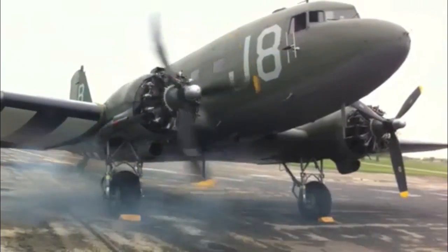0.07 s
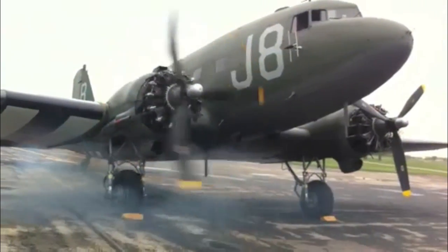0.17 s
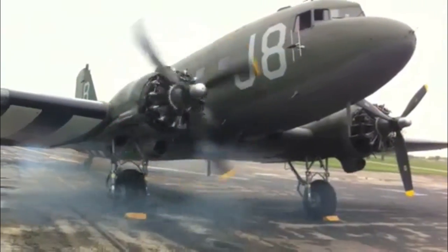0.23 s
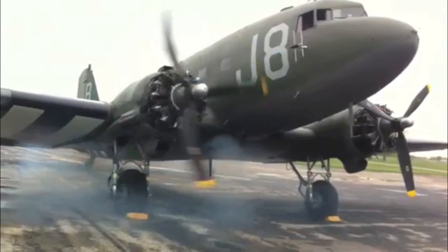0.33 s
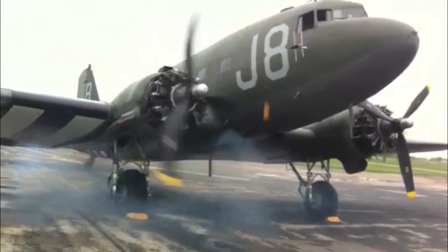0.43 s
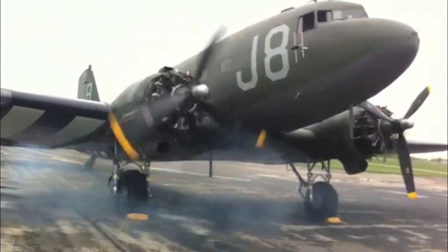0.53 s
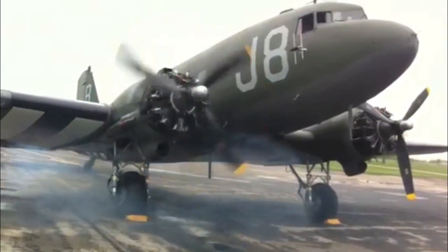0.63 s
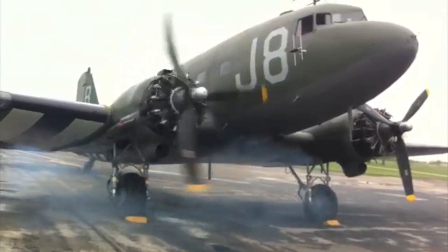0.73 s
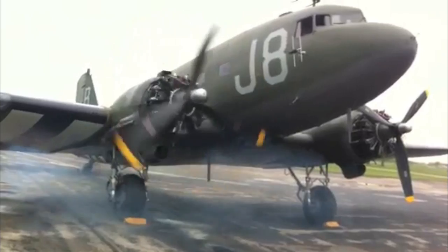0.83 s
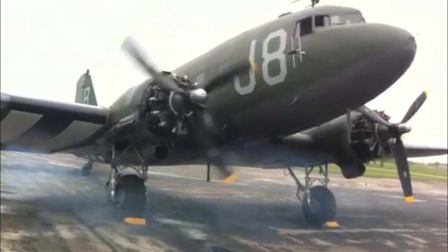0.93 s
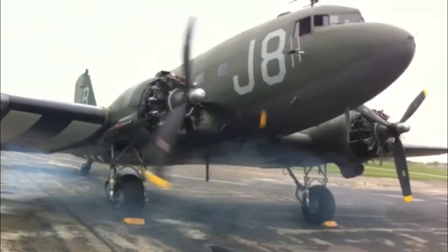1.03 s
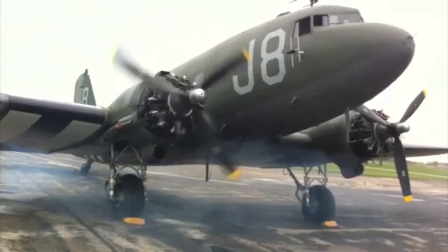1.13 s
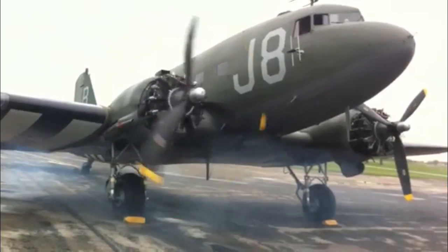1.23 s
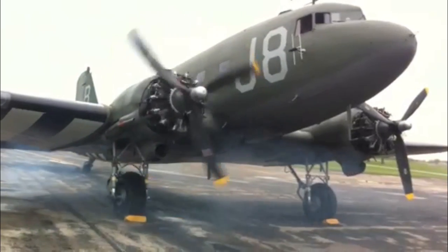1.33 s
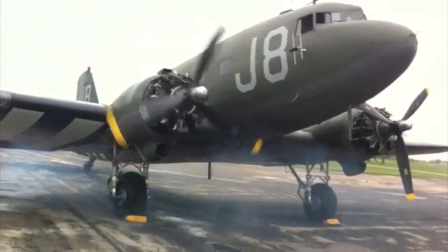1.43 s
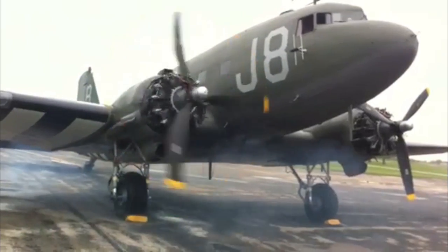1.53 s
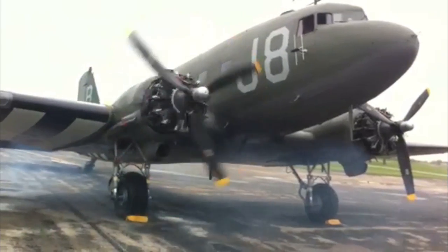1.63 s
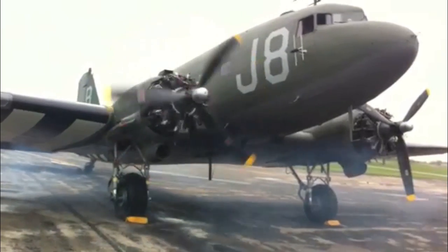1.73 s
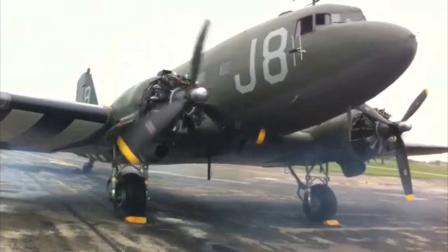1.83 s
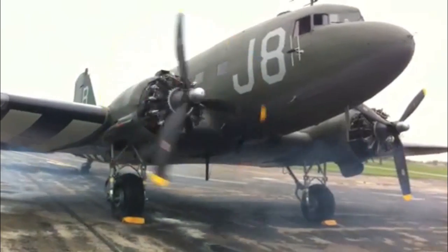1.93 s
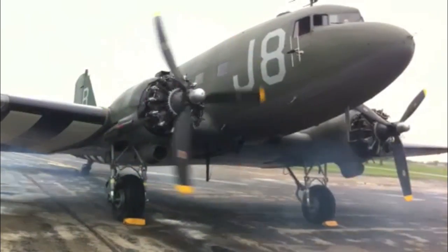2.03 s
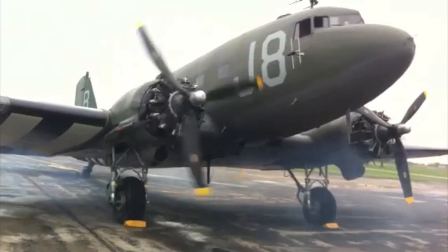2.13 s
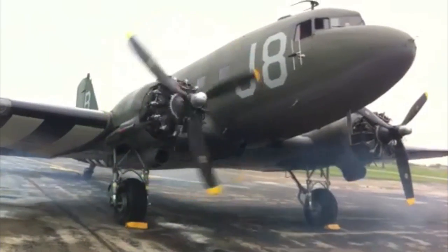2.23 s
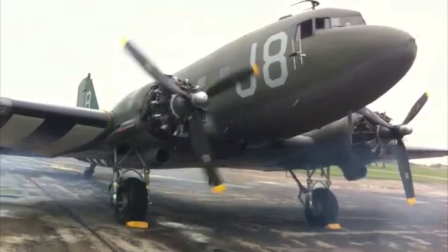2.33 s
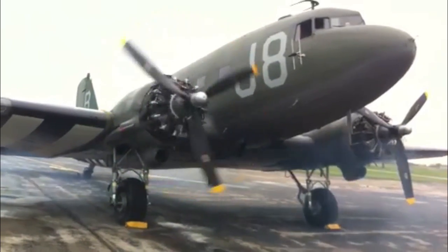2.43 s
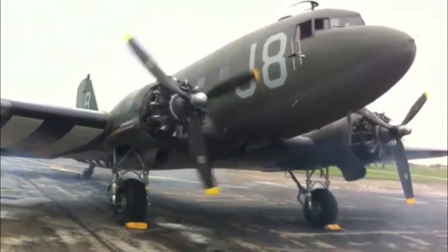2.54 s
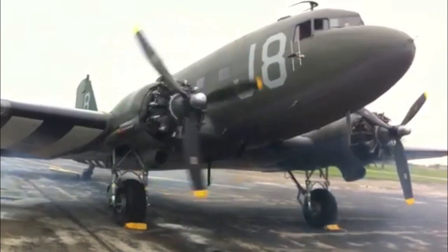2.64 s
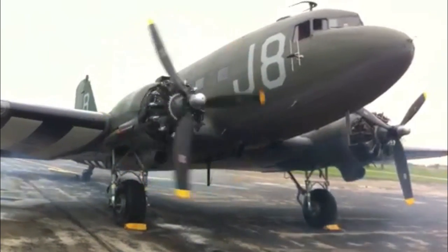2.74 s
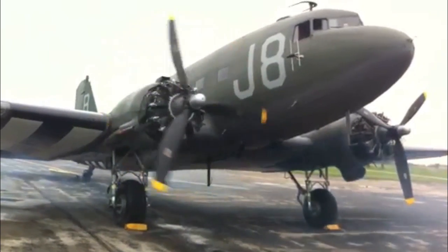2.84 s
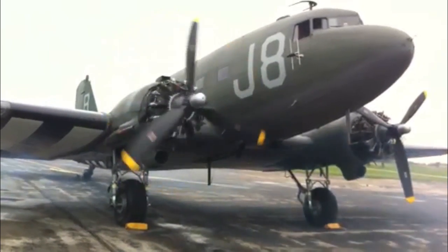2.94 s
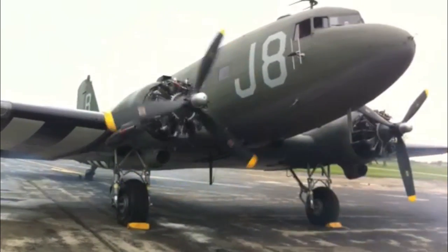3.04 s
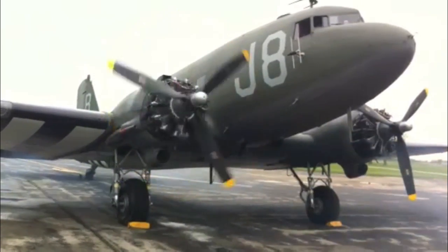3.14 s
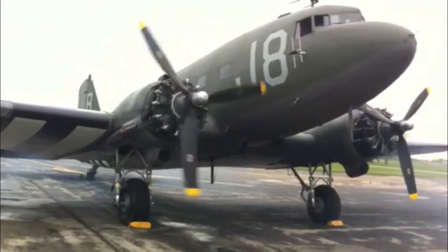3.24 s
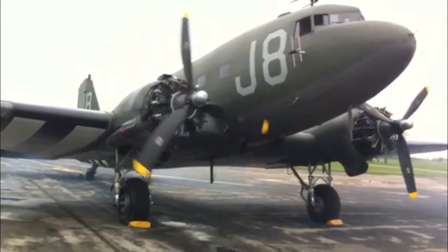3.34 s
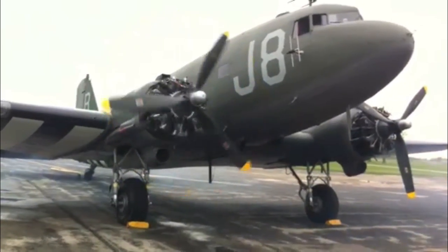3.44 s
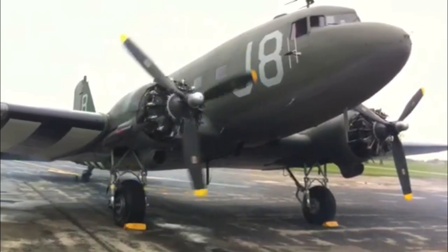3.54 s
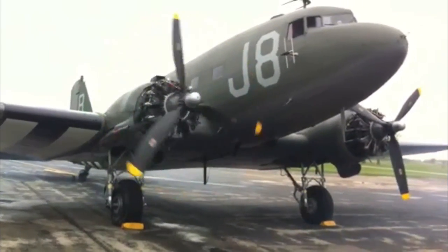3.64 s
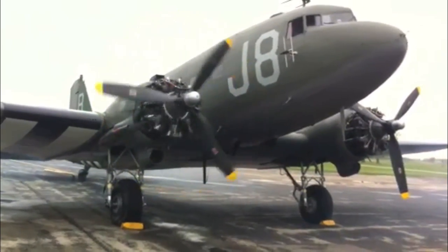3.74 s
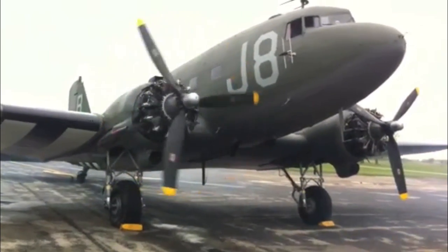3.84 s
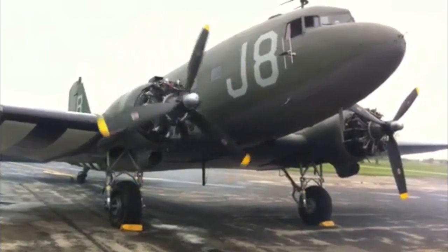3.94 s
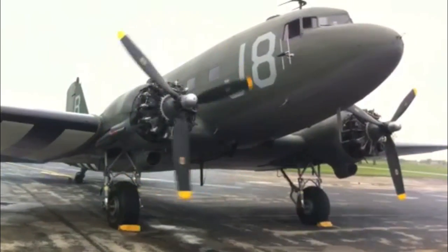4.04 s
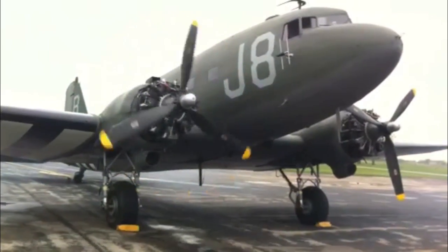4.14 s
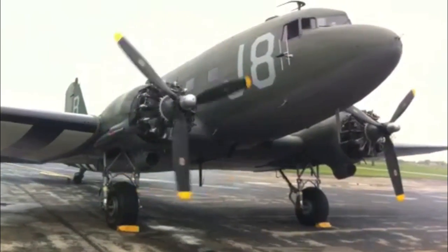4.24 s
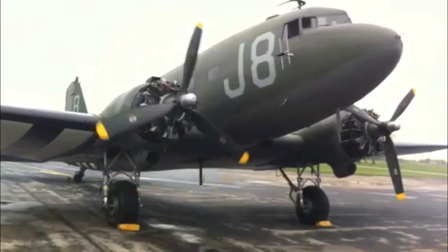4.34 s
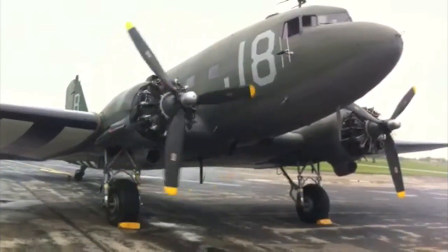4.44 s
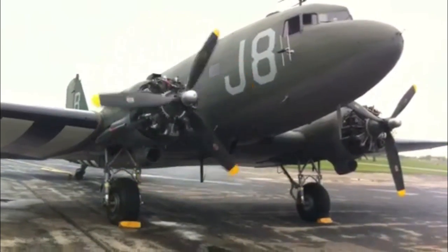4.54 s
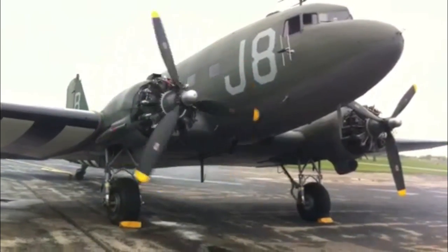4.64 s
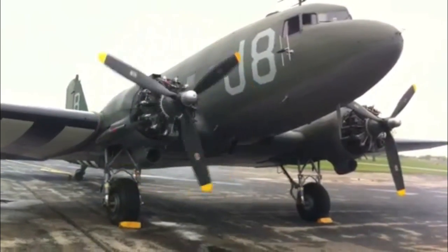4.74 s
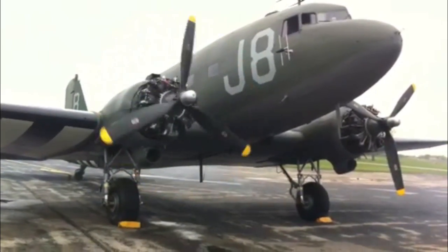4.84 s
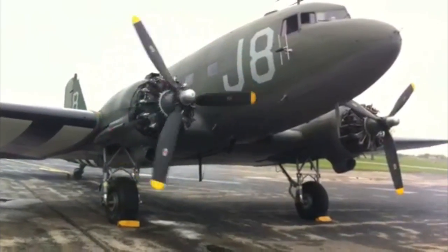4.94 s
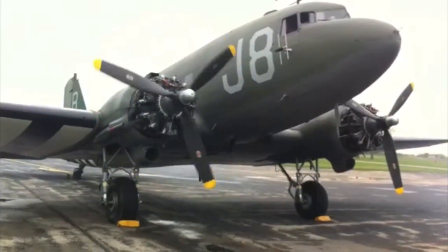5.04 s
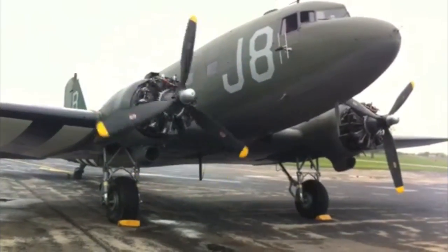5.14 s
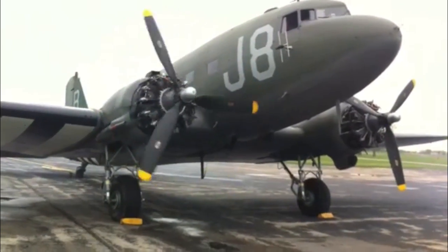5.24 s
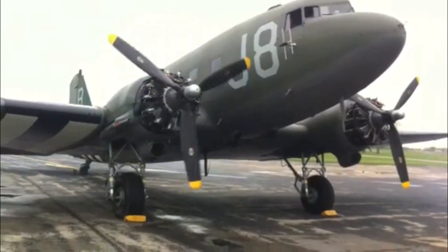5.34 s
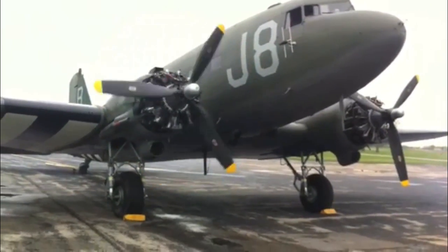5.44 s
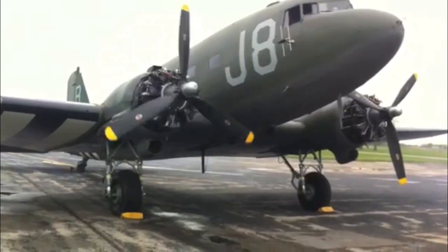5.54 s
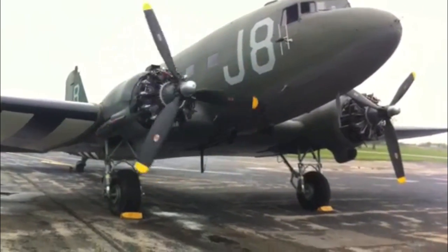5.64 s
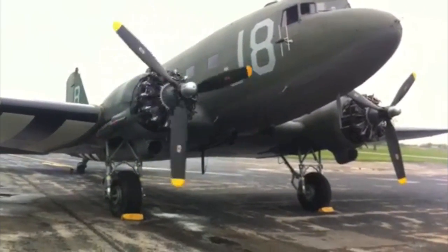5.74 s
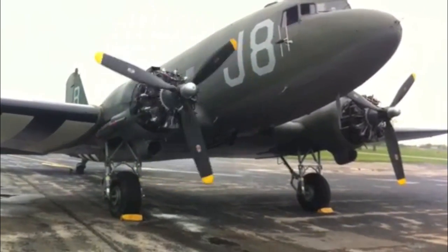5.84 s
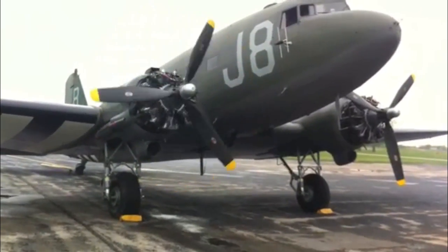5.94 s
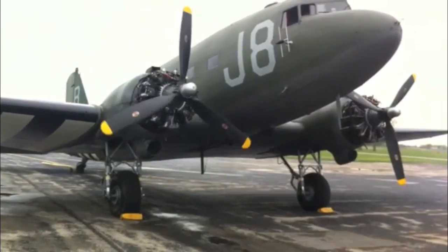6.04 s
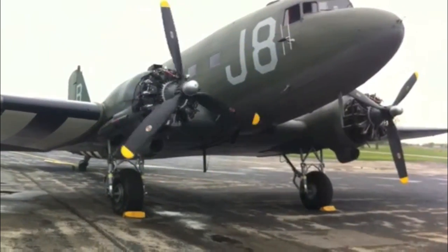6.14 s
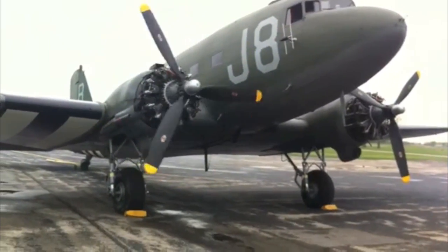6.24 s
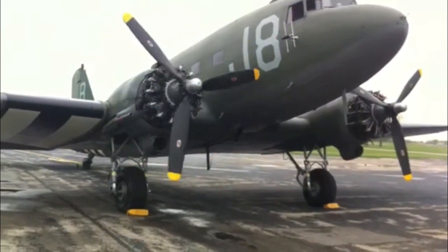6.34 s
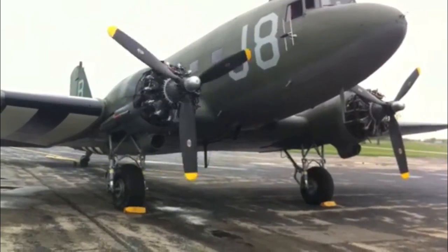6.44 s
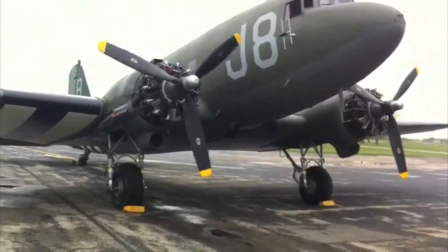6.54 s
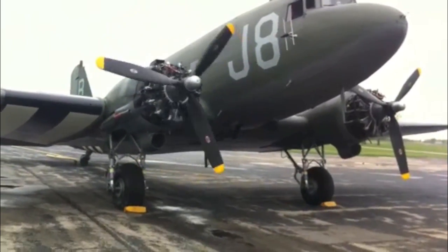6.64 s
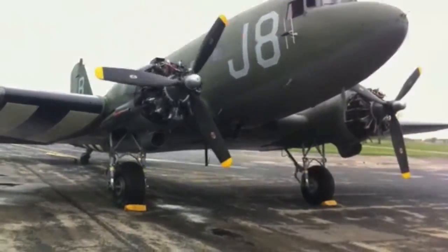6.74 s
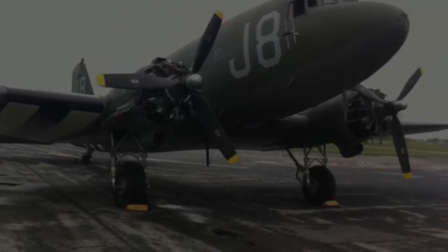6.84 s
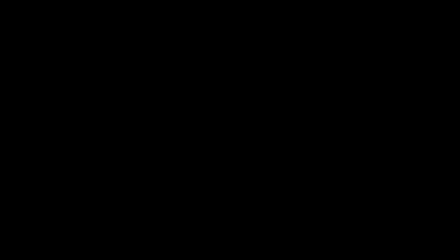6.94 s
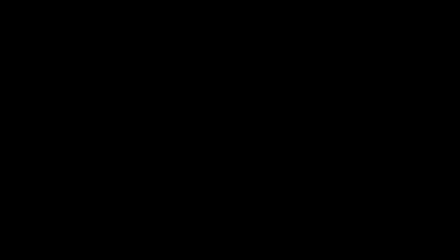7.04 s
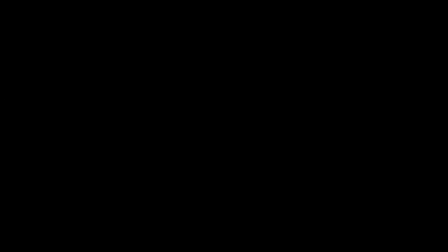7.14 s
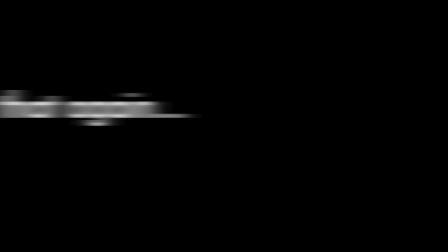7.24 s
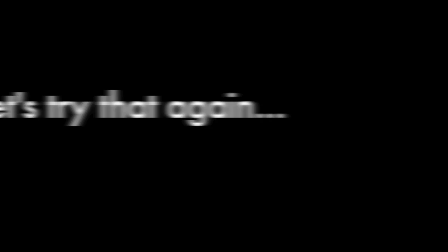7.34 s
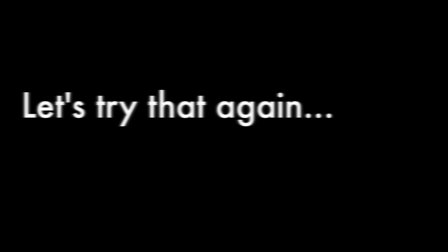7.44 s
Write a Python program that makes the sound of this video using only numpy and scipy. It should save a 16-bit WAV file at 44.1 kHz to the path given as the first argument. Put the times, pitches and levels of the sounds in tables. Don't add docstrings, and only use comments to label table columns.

```python
import sys
import numpy as np
from scipy import signal
from scipy.fft import rfft, irfft, next_fast_len
from scipy.io import wavfile
from scipy.ndimage import uniform_filter1d, map_coordinates

SR = 44100
rng = np.random.default_rng(int(sys.argv[2]) if len(sys.argv) > 2 else 0)


def to_linear_factor(level_db):
    exponent = np.asarray(level_db, float) / 20
    return 10 ** exponent


def dump(signal):
    limited = np.clip(np.atleast_2d(signal).T, -1, 1)
    pcm = np.round(limited * 32767).astype(np.int16)
    wavfile.write(sys.argv[1], SR, pcm)


N = 329868

# t/s, clatter level/dB
EFFORT = [(0, -26.5), (0.42, -26.5), (0.74, -28), (1.05, -29), (1.4, -31.5), (1.8, -32.5), (2.2, -35),
          (2.6, -36), (3, -37.5), (3.5, -40), (4, -43), (4.5, -44.5), (5, -47), (6, -48), (6.8, -51)]
IDLE_DB = -31
# t/s, valve open time/s, jet level/dB, bark level/dB
FIRINGS = [(0, 0.013, -16.5, -31.5), (0.014, 0.03, -23.5, -24), (0.078, 0.032, -20, -30),
           (0.11, 0.045, -28, -19), (0.17, 0.034, -17.5, -32), (0.258, 0.012, -24.5, -33),
           (0.295, 0.024, -17, -28), (0.333, 0.028, -16.5, -23.5), (0.36, 0.028, -26.5, -36),
           (0.47, 0.038, -23.5, -23), (0.512, 0.028, -27.5, -26.5), (0.548, 0.016, -16, -21.5),
           (0.581, 0.052, -18.5, -27.5), (0.634, 0.03, -19.5, -20.5), (0.904, 0.056, -19.0, -31.5),
           (0.94, 0.026, -23, -36), (0.97, 0.014, -25.5, -30)]
# f/Hz, level/dB
CASING_SPECTRUM = [(180, -16.5), (300, 1.5), (398, -8.5), (544, -1.5), (722, -5), (850, -3.5), (1740, -1),
                   (2840, -13.5), (3150, -17.5), (5220, -11.5), (7240, -31.5), (8530, -22), (10500, -54),
                   (13600, -62), (22000, -120)]
# f/Hz, level/dB
JET_SPECTRUM = [(1470, -42), (2500, -5), (2850, -14.5), (3270, -15), (3780, -9), (4470, -3), (4860, 0),
                (5790, 2.5), (6850, -8), (9160, 0), (11300, -10.5), (14500, -7.5), (15500, -14.5)]
# f/Hz, level/dB
PORT_SPECTRUM = [(15, -69), (25, -37), (43, -40), (102, -1), (216, 1), (284, -10.5), (345, -8.5),
                 (469, -10.5), (1200, -29), (1560, -58), (2640, -120)]


def unit(x):
    return x / np.sqrt(np.mean(x ** 2) + 1e-20)


def along(points, hz):
    f, v = np.transpose(points)
    return np.interp(np.log(hz + 1), np.log(f + 1), v)


def curves(rows):
    s, *cols = np.transpose(rows)
    return [np.interp(np.arange(N) / SR, s, c) for c in cols]


def wobble(rate):
    knots = rng.standard_normal(int(N * rate / SR) + 4)
    return map_coordinates(knots, [np.arange(N) * rate / SR])


def filtered(x, response):
    m = next_fast_len(len(x) + SR // 10)
    return irfft(rfft(x, m) * response(np.fft.rfftfreq(m, 1 / SR)), m)[:len(x)]


def noise(spectrum, rough_db=0, rate=100, patchy_db=2):
    z = signal.stft(rng.standard_normal(N), nperseg=512)[2]
    field = uniform_filter1d(rng.standard_normal(z.shape), size=3, axis=0)
    field = uniform_filter1d(field, size=8, axis=1)
    patchy = signal.istft(z * to_linear_factor(patchy_db * unit(field)), nperseg=512)[1][:N]
    drive = patchy * to_linear_factor(rough_db * wobble(rate))
    return unit(filtered(drive, lambda hz: to_linear_factor(along(spectrum, hz))))


def resonance(centre_hz, width_hz):
    return lambda f: 1j * f * width_hz / (centre_hz ** 2 - f ** 2 + 1j * f * width_hz)


def swell(length, rise, t60):
    t = np.arange(length) / SR
    shape = (1 - np.exp(-t / rise)) * to_linear_factor(-60 * t / t60)
    return shape / shape.max()


def add(track, s, piece):
    track[round(s * SR):][:len(piece)] += piece


def exhaust():
    jet_power, bark_power = np.zeros(N), np.zeros(N)
    t = np.arange(SR // 4) / SR
    for s, open_s, jet_db, bark_db in FIRINGS:
        blow = (1 - np.exp(-t / 0.0045)) * to_linear_factor(-60 * np.maximum(t - open_s, 0) / 0.11)
        add(jet_power, s, (to_linear_factor(jet_db - 1.0) * blow) ** 2)
        add(bark_power, s, (to_linear_factor(bark_db - 3.5) * blow) ** 2)
    jet = np.sqrt(jet_power) * noise(JET_SPECTRUM, rough_db=1.7, rate=110)
    bark = np.sqrt(bark_power) * noise(CASING_SPECTRUM, rough_db=5.5, rate=180)
    return jet + bark


def stacks():
    idle_rumble_db, rumble_per_clatter_db = -34, 1.92
    thud_db, thud_t60 = -5, 0.26
    power = to_linear_factor(idle_rumble_db + rumble_per_clatter_db * (curves(EFFORT)[0] - IDLE_DB)) ** 2
    for s, _, jet_db, _ in FIRINGS:
        add(power, s, (to_linear_factor(jet_db + thud_db) * swell(SR // 4, .014, thud_t60)) ** 2)
    return np.sqrt(power) * noise(PORT_SPECTRUM, rough_db=3.5, rate=55)


def contacts():
    # t/s, peak level/dB, crack level/dB
    seats = [(0.5747, -9, -17), (0.6881, -18, -1), (0.773, -13, -12), (0.8977, -5, -23),
             (0.9777, -15, -7.5), (1.0936, -12, -9), (1.1868, -10, -5), (1.3182, -11, -13),
             (1.415, -10, -24.5), (1.5516, -9.5, -19), (1.6605, -13, -10.5), (1.8044, -10, -18.5),
             (1.9231, -11, -15.5), (2.0839, -8.5, -28.5), (2.2123, -13.5, -10), (2.386, -8, -17.5),
             (2.529, -13.5, -13), (2.7253, -9.5, -15.5), (2.8891, -13, -9), (3.1097, -9, -22),
             (3.2959, -11, -12), (3.5531, -11, -14), (3.7789, -11.5, -13), (4.0957, -14, -16),
             (4.3831, -13.5, -12), (4.81, -15, -15.5), (5.235, -19, -10), (5.9998, -16, -18)]
    # share of the way to the next seat, peak level/dB,
    # slope/dB per doubling of speed, ring f/Hz, crack level/dB
    after_rear = [(.325, -18.5, 2, 1505, -21), (.505, -21.5, 3.5, 1150, -18.5),
                  (.795, -18.5, -2, 1350, -11.5)]
    after_front = [(.135, -15, 2, 1300, -24), (.285, -27.5, .1, 1450, -13), (.49, -19.5, 3, 1400, -18),
                   (.645, -25, 2.5, 1450, -8.5)]
    # t/s, peak level/dB, ring f/Hz, crack level/dB
    strays = [(0.099, -8, 1510, -15), (0.3115, -8.5, 2190, -11.5), (0.3957, -13, 1500, -4.5),
              (0.4542, -8.5, 1570, -15.5), (5.3366, -26.5, 1900, -10.5), (5.4456, -22, 1420, -22),
              (5.5685, -24, 1805, -19), (5.797, -20, 1700, -16), (6.017, -24.5, 1120, -30.5),
              (6.111, -24.5, 1470, -25), (6.195, -36.5, 1060, -8), (6.4903, -29.5, 1400, -20.5),
              (6.981, -33.5, 1177, -6)]
    seat_hz, seat_t60 = (1630, 1630), (0.059, .05)
    front_to_rear = .44
    cam_t60, cam_scatter_db, slowing = .052, 1.55, .2
    gap = np.diff([s for s, _, _ in seats])
    speed = np.resize([1 - front_to_rear, front_to_rear], len(gap)) / gap
    bend = slowing / speed ** 2
    rows = []
    for k, (s, db, crack_db) in enumerate(seats):
        rows.append((s, db, seat_hz[k % 2], crack_db, seat_t60[k % 2]))
    for k in range(len(gap) - 1):
        for share, db, slope_db, hz, crack_db in (after_rear, after_front)[k % 2]:
            s = seats[k][0] + gap[k] * (share - bend[k] * share * (1 - share))
            peak_db = db + slope_db * np.log2(speed[k] / 2) + cam_scatter_db * rng.normal()
            rows.append((s, peak_db, hz, crack_db, cam_t60))
    return rows + [(*row, cam_t60) for row in strays]


def valves():
    # f/Hz, width/Hz, level/dB
    panels = [(855, 59, 1), (1084, 90, 0.5), (1400, 98, -2.5), (1570, 80, 2), (1750, 66, -2),
              (1975, 190, -4.5), (2167, 65.3, -1.5), (2410, 100, -11.5), (2731, 79, -7.5)]
    # f/Hz, level/dB
    crack_spectrum = [(1470, -34.5), (2500, 5), (2910, -5), (3290, -14), (3720, -2.5), (4110, -13),
                      (5130, -3.5), (7340, -17), (8480, -15), (12100, -23.5), (15500, -32.5)]
    rings, shake, crack, length = np.zeros(N), np.zeros(N), np.zeros(N), SR // 8
    for s, db, hz, crack_db, t60 in contacts():
        impacts = rng.standard_normal(length) * swell(length, 0.002, 1.22 * t60)
        reach_db = [level + rng.normal(0, 1.2) - 9 * abs(np.log2(c / hz)) for c, _, level in panels]

        def struck(f):
            total = 0.61 * resonance(hz, 300)(f)
            for k, (c, w, _) in enumerate(panels):
                total = total + (-1) ** k * to_linear_factor(reach_db[k]) * resonance(c, w)(f)
            return total

        ring = filtered(impacts, struck)
        add(rings, s - .0022, to_linear_factor(db - 3.5) * ring / np.abs(ring).max())
        add(shake, s - .0025, to_linear_factor(db - 18) * swell(length, 0.0018, 1.0 * t60))
        add(crack, s - .0035, to_linear_factor(db + crack_db - 5) * swell(length, 0.0005, 1.3 * t60))
    stiff = filtered(noise(CASING_SPECTRUM, rough_db=0, rate=370), lambda f: (1j * f / (900 + 1j * f)) ** 4)
    direct = rings + shake * unit(stiff) + crack * noise(crack_spectrum, rough_db=0.5, rate=390, patchy_db=6)
    hull = rng.standard_normal(length * 2) * swell(length * 2, 0.0082, 0.1)
    return direct + to_linear_factor(-12.5) * signal.fftconvolve(direct, hull / np.linalg.norm(hull))[:N]


def engine():
    idle_hiss_db, hiss_per_clatter_db, leak_db = -37, 1.6, -58.5
    clatter_db, = curves(EFFORT)
    intake = np.hypot(to_linear_factor(idle_hiss_db + hiss_per_clatter_db * (clatter_db - IDLE_DB)), to_linear_factor(leak_db))
    rattle = noise(CASING_SPECTRUM, rough_db=1.5, rate=150, patchy_db=2.5)
    rattle = to_linear_factor(clatter_db + 2.38 + 1.1 * wobble(22)) * rattle
    hiss = noise(JET_SPECTRUM, rough_db=0.5, rate=240, patchy_db=4.0)
    return rattle + intake * to_linear_factor(-3.0 + 0.74 * wobble(20)) * hiss


def blower():
    # t/s, f/Hz, level/dB
    whistle = [(1.3, 16000, -58), (1.55, 15350, -40), (1.62, 14650, -39), (1.78, 13700, -37),
               (1.95, 12900, -45), (2.08, 12450, -44), (2.42, 11700, -58)]
    hz, db = curves([(1.1, 16740, -100)] + whistle + [(2.6, 11480, -100)])
    phase = 2 * np.pi * np.cumsum(hz + 70 * wobble(45)) / SR
    flutter = to_linear_factor(4.5 * wobble(30))
    smear = wobble(550) * np.sin(phase) + wobble(550) * np.cos(phase)
    return to_linear_factor(db - 3) * flutter * smear


def shudder():
    # t/s, length/s, peak level/dB, f/Hz
    flaps = [
        (4.539, .04, -30, 199.5),
        (5.389, .04, -26, 218),
        (5.556, 0.046, -24, 249.6),
        (5.789, .043, -12, 204.5),
        (6.16, .03, -30.5, 229),
    ]
    # t/s, peak level/dB
    slaps = [
        (4.992, -23),
        (5.257, -21),
        (5.378, -13.5),
        (5.397, -20),
        (5.704, -25),
        (5.822, -17),
        (5.883, -27.5),
        (6.071, -31),
    ]
    slap_s = 0.00042
    flap, t = np.zeros(N), np.arange(SR // 8) / SR
    pace, sway_db = 1 + .15 * wobble(60), 1.5 * wobble(90)
    for s, hold, db, hz in flaps:
        now = slice(round(s * SR), round(s * SR) + len(t))
        phase = 2 * np.pi * np.cumsum(hz * pace[now]) / SR
        shape = (1 - np.exp(-t / .006)) * to_linear_factor(-60 * np.maximum(t - hold, 0) / .03 + sway_db[now])
        cycle = np.sin(phase) + 0.47 * np.sin(2 * phase + 1) + 0.18 * np.sin(3 * phase)
        add(flap, s, to_linear_factor(db) * shape * cycle)
    u = t[:SR // 100] / slap_s - 3
    for s, db in slaps:
        add(flap, s, -to_linear_factor(db) * (1 - u ** 2) * np.exp(-u ** 2 / 2))
    return flap


def wind():
    # t/s, buffet level/dB
    wash = [(0, -37), (2.5, -40.5), (2.9, -47), (3.3, -40.5), (4, -41.5), (4.4, -38.5), (4.85, -44),
            (5.6, -27), (6, -38), (6.3, -37.5), (7, -47)]
    # t/s, length/s, buffet level/dB
    gusts = [(4.072, .1, -38), (4.262, 0.12, -41), (4.559, 0.062, -29), (4.78, 0.013, -35.5),
             (4.99, 0.041, -27.5), (5.196, 0.068, -26), (5.378, 0.047, -22), (5.503, .12, -26.5),
             (5.68, 0.022, -27), (5.802, 0.02, -26), (5.893, 0.046, -37), (6.05, .14, -35),
             (6.53, 0.085, -44.5), (6.867, 0.12, -39)]
    # t/s, peak level/dB, f/Hz
    eddies = [(4.584, -16, 187), (4.612, -17, 277), (4.981, -15, 313), (4.992, -14.5, 380),
              (5.017, -16.5, 250), (5.198, -19.5, 290), (5.216, -16.5, 390), (5.237, -15.5, 260),
              (5.257, -12.5, 355), (5.362, -12.5, 285), (5.381, -13.5, 330), (5.4, -13, 260),
              (5.417, -23, 221), (5.484, -14, 220), (5.517, -14, 221), (5.533, -8, 285), (5.55, -11.5, 272),
              (5.57, -14, 253), (5.602, -15.5, 340), (5.626, -13, 270), (5.704, -7, 262), (5.775, -18, 220),
              (5.791, -9, 344), (5.806, -15, 340), (5.822, -13.5, 300), (5.922, -17, 269),
              (5.967, -19.5, 167), (6.055, -16.5, 230), (6.07, -18, 302), (6.172, -19.5, 233)]
    rise_db_per_s, fall_db_per_s = 197, 250.5
    now = np.arange(N) / SR
    power = to_linear_factor(curves(wash)[0]) ** 2
    for s, hold, db in gusts:
        under_db = rise_db_per_s * np.maximum(s - now, 0) + fall_db_per_s * np.maximum(now - s - hold, 0)
        power = power + to_linear_factor(db - under_db) ** 2
    buffet = to_linear_factor(0.5) * np.sqrt(power) * noise(PORT_SPECTRUM, rough_db=4, rate=70)
    t = np.arange(SR // 20) / SR
    for (s, db, hz), (side, pitch, edge) in zip(eddies, rng.random((len(eddies), 3))):
        push = swell(len(t), 0.0036, 5 / hz) * np.sin(2 * np.pi * 0.91 * hz * t)
        front = swell(len(t), 0.0028, 0.012) * np.sin(2 * np.pi * (450 + 700 * pitch) * t)
        push = push + to_linear_factor(-24.0 + 17.0 * edge) * front
        add(buffet, s - .004, np.sign(side - .5) * to_linear_factor(db - 1.5) * push)
    breeze = noise([(20, -5.0), (60, -9.5), (130, -2.5), (250, -7.5), (500, -35.5), (2000, -120)])
    return buffet + to_linear_factor(-48 + 3.5 * wobble(6)) * breeze


def apron():
    # f/Hz, level/dB
    hum_spectrum = [(180, -43), (400, -18.5), (660, -6.5), (1400, -7), (2100, -17), (3050, -23.5),
                    (3600, -11), (4570, -12), (6570, -23.5), (9000, -29.5), (10400, -46), (15500, -41)]
    # f/Hz, width/Hz, level/dB
    lines = [(1384.4, 47, -49), (1860, 40, -67), (579, 25, -60), (662.8, 20, -55.5), (815, 36, -57.5),
             (934.5, 20, -57.5), (5520, 20, -64.5), (4520, 53, -60.5)]
    hum = to_linear_factor(-49.5 + 0.73 * wobble(2.6)) * noise(hum_spectrum)
    for c, w, db in lines:
        line = filtered(rng.standard_normal(N), lambda f: resonance(c, w)(f) ** 2)
        hum = hum + to_linear_factor(db + 1.1 * wobble(4)) * unit(line)
    return hum


def scene():
    machine = exhaust() + stacks() + valves() + engine() + blower()
    return (machine + shudder() + wind() + apron())[None]


def band_limit(x):
    return signal.sosfilt(signal.butter(12, 15660, fs=SR, output="sos"), x)


def record(dry):
    # t/s, level/dB
    fade = [
        (0, 0.5),
        (6.8, 0),
        (6.96, -8),
        (7.013, -6.5),
        (7.015, -65),
        (7.48, -100),
    ]
    top_hz = 15800
    cut = filtered(dry[0], lambda hz: (1j * hz / (90 + 1j * hz)) ** 2 * (hz < top_hz))
    return band_limit((cut * to_linear_factor(curves(fade)[0]))[None])


dry = scene()
out = record(dry)
dump(out)
```